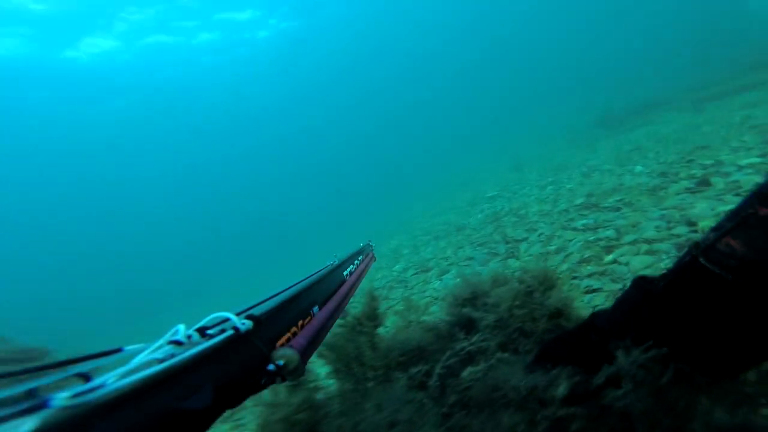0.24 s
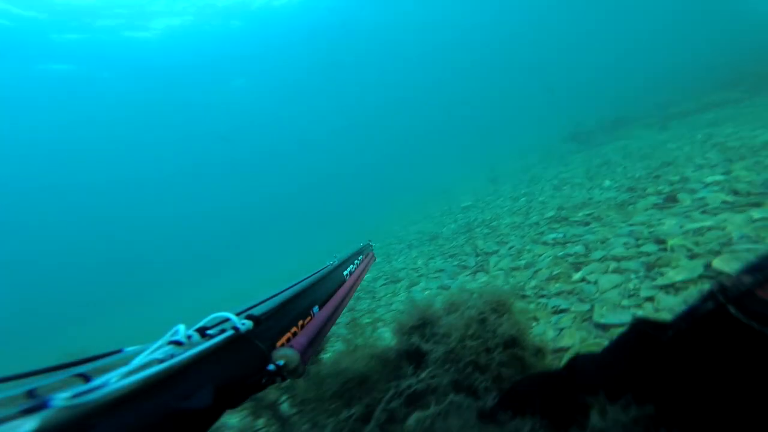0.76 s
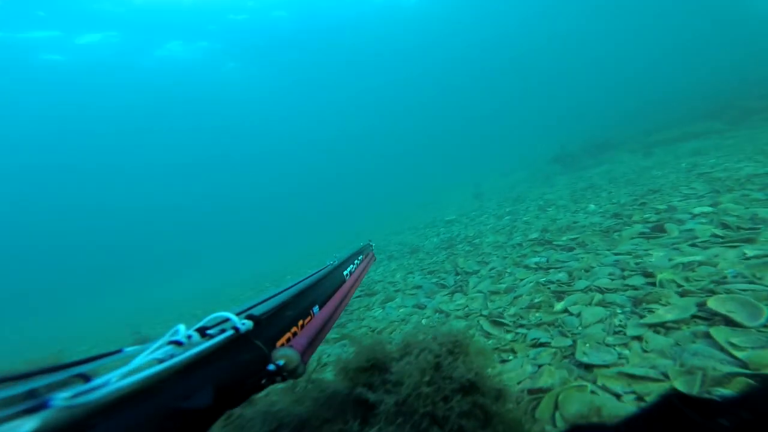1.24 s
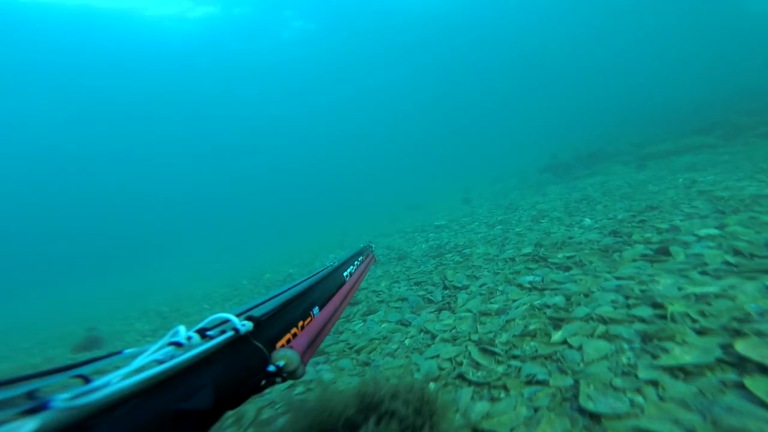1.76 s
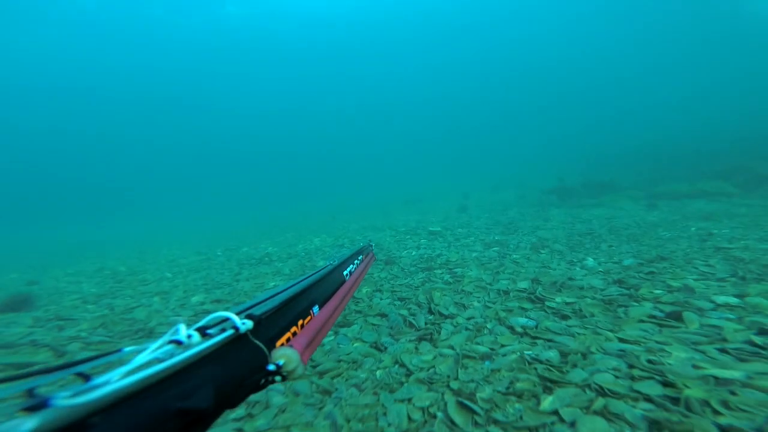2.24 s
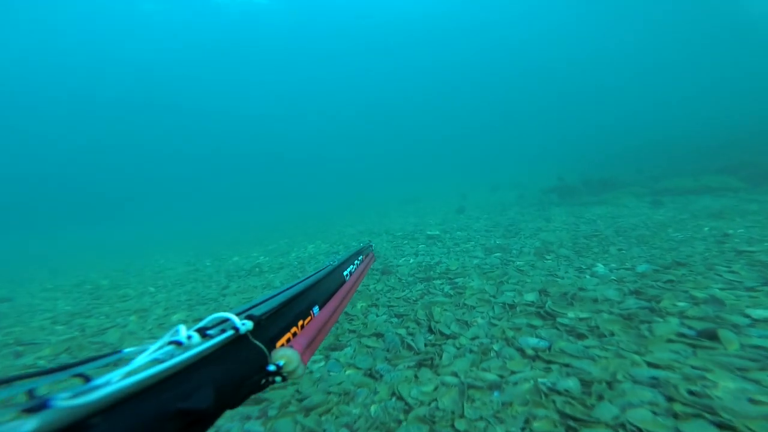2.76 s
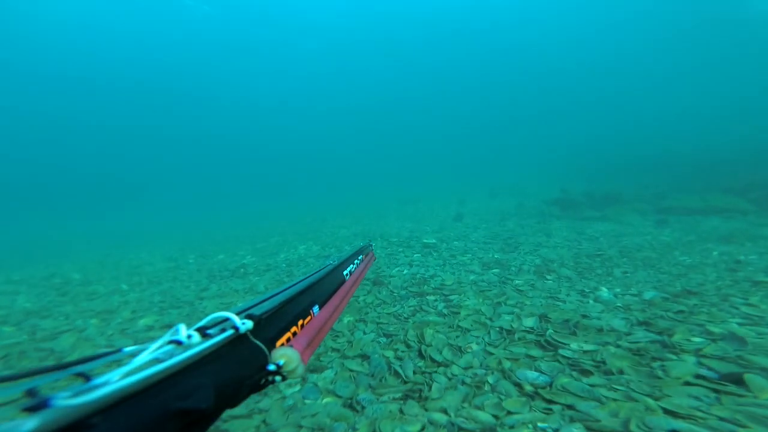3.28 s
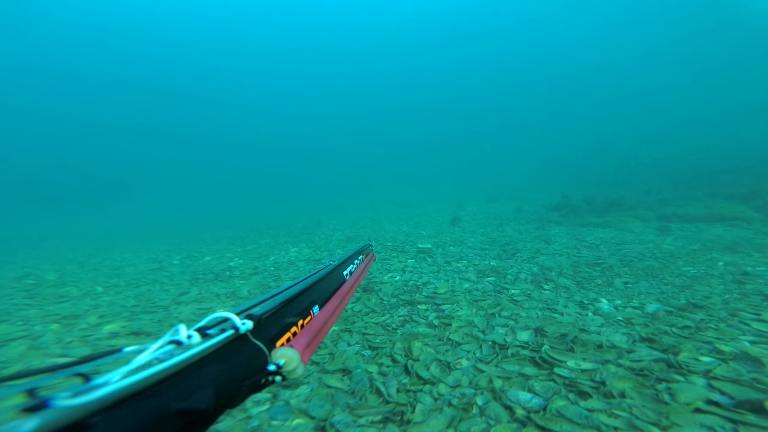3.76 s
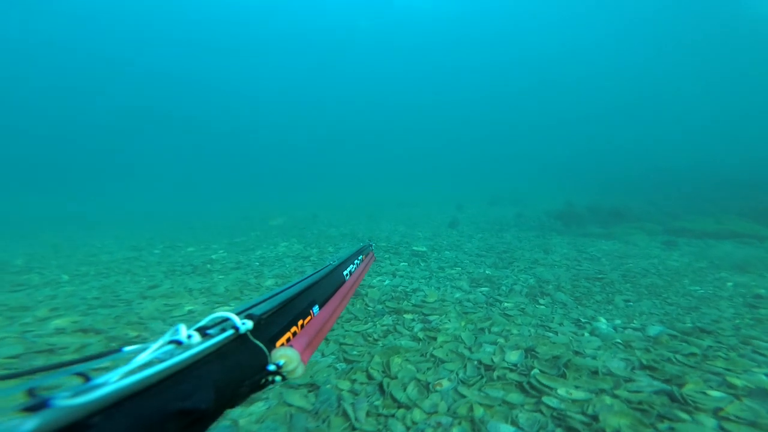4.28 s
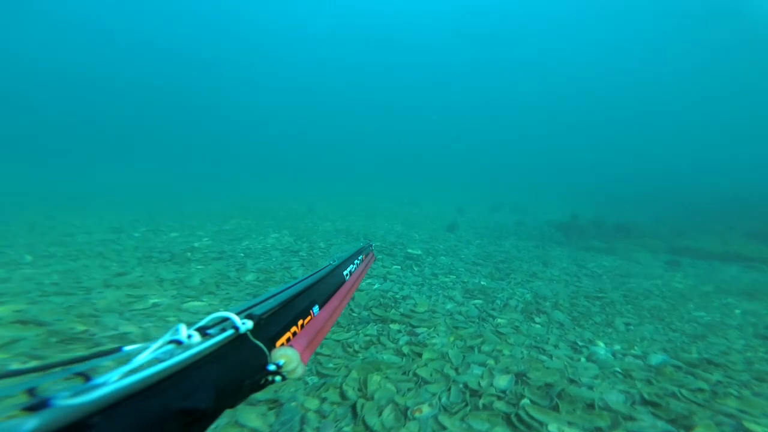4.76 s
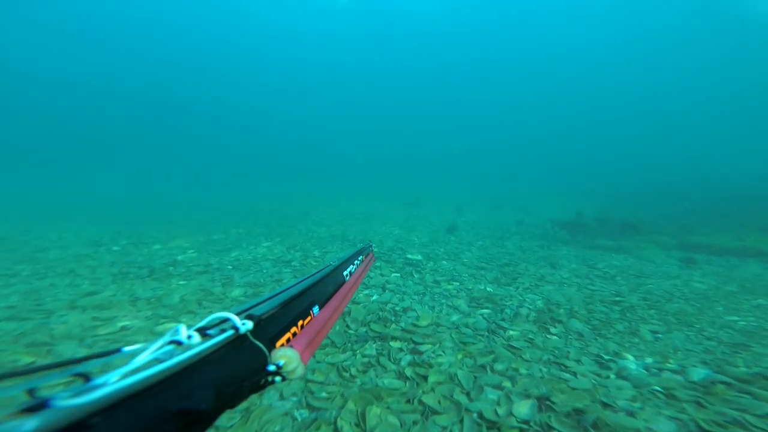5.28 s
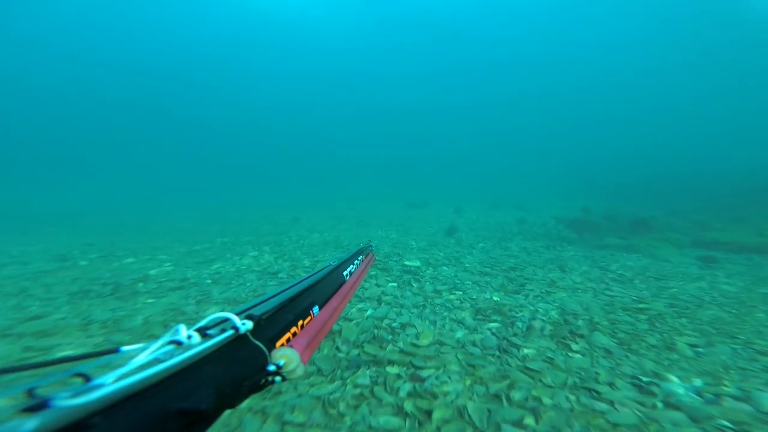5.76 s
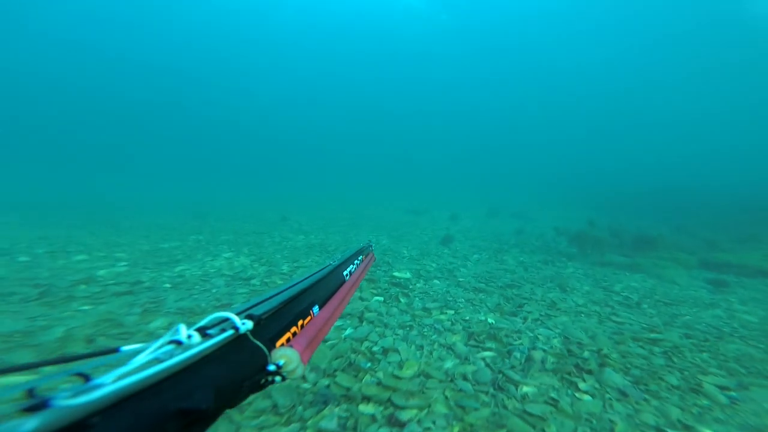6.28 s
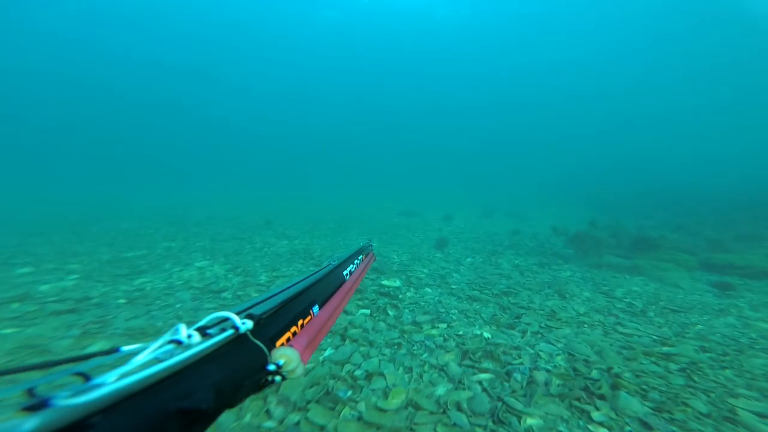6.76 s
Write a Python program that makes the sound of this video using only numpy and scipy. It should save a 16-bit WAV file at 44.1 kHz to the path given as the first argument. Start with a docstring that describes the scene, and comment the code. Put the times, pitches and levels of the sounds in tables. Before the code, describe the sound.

Underwater over a shell-covered seabed, snapping shrimp make constant irregular crackling: fine distant ticks beneath sharper, ringing near clicks, densest from about three seconds. Small bubbles plink and gurgle hollowly, and the camera housing gives occasional dull thumps, the strongest just before two seconds and again after five. Soft water wash, low flow rumble and steady electronic hiss lie underneath. Close stereo microphones inside a waterproof housing; clicks scatter left and right while low sounds stay central.

```python
"""Shrimp snaps near and far ring the modes of a camera's waterproof housing gliding over a shell-covered seabed.
Each snap is a click with sparse echoes; two microphones hear every mode at their own level and phase.
Bubbles plink and gurgle as short swelling tones, coloured by air pockets; the housing thumps and rumbles
in the flow as lower tones. Shaped noise makes the water wash and the hiss; a sign-flipped tone whines faintly."""
import sys
import numpy as np
from scipy import signal
from scipy.fft import rfft, irfft
from scipy.io import wavfile

SR = 44100
rng = np.random.default_rng(int(sys.argv[2]) if len(sys.argv) > 2 else 0)


def transcribe(u):
    """Save the signal u as a 16-bit wav file named by the first command-line argument.

    u: samples, shape (n,) or (channels, n), limited to [-1, 1]; the rate is SR.
    q: integer samples, one column per channel.
    """
    v = np.clip(np.atleast_2d(u).T, -1, 1)
    q = np.round(v * 32767).astype(np.int16)
    wavfile.write(sys.argv[1], SR, q)


N = 310023


def undb(db):
    """Decibels to amplitude gain."""
    return 10 ** (np.asarray(db) / 20)


def level(x, rms_db):
    """Scale to an rms level, taken over all channels."""
    return x * undb(rms_db) / np.sqrt(np.mean(x ** 2))


def add(out, start_s, sound):
    """Mix a short sound into out, cut at the end of out."""
    i = max(int(start_s * SR), 0)
    n = max(min(sound.shape[-1], N - i), 0)
    out[..., i:i + n] += sound[..., :n]


def filtered(x, order, cutoff_hz, kind):
    """Butterworth filter."""
    return signal.sosfilt(signal.butter(order, cutoff_hz, kind, fs=SR, output="sos"), x)


def random_curve(points):
    """Random values joined by straight lines over the whole sound."""
    return np.interp(np.linspace(0, 1, num=N), np.linspace(0, 1, num=points), rng.standard_normal(points))


def ring(x, pitch_hz, width_hz):
    """One resonance as a rotating, decaying complex arrow; gain 1 at the centre."""
    pole = np.exp((2j * np.pi * pitch_hz - np.pi * width_hz) / SR)
    return signal.lfilter([1 - abs(pole)], [1, -pole], x)


# housing modes: (pitch_hz, width_hz, left_gain_db, right_gain_db, left_lead_rad)
HOUSING_MODES = [(1200, 350, -15, -6, 0.5), (1730, 120, -10, 2, 2.9), (1890, 180, -7.5, -9.5, 1.7),
                 (2170, 350, -4, -14, -1.0), (2630, 190, -1.5, 3.5, -1.6), (2900, 260, -14.5, -1.5, -1.9),
                 (3400, 430, -7.5, -8.0, 2.4), (3990, 450, -11.0, -11.0, -1.7),
                 (4900, 250, -3.5, -1.0, -3.1), (5230, 460, -9.0, -4.0, 1.6), (5990, 580, -9.0, -4.5, 0.1),
                 (6720, 700, -14.5, -9.0, -0.3), (7930, 1720, -13.0, -13.5, -2.0),
                 (9980, 2010, -15.0, -14.5, 2.9), (11560, 1670, -19.5, -18.5, 0.8),
                 (15070, 1570, -18.0, -13.5, 0.6)]


def housing(force):
    """Modes ring under their forces; each microphone sits at a different place on each mode."""
    out = np.zeros((2, N))
    for k, (pitch_hz, width_hz, left_db, right_db, lead_rad) in enumerate(HOUSING_MODES):
        soft = ring(force[k], pitch_hz, 0.8 * pitch_hz)  # a mode answers little far from its own pitch
        sense = (-1) ** k  # neighbouring modes swing in opposite sense
        motion = sense * ring(soft, pitch_hz, width_hz)
        left = undb(left_db) * (motion * np.exp(1j * lead_rad)).imag
        right = undb(right_db) * motion.imag
        out += np.array([left, right])
    # the ringing keeps little below about 1 kHz
    return filtered(out, 2, 950, "high")


def strike(rows, decay_s, echo_db, scatter_db):
    """Force on each mode: a click, then sparse seabed echoes falling 60 dB per decay time; own colour per snap."""
    BROAD_DB = -35  # weak click at all pitches
    modes_hz = np.array(HOUSING_MODES)[:, 0]
    force = np.zeros((len(modes_hz), N))
    t = np.arange(SR // 25) / SR
    for (start_s, force_db, pitch_hz, octaves), t60_s in zip(rows, np.broadcast_to(decay_s, len(rows))):
        sparse = rng.standard_normal(len(t)) ** 3 / 4
        burst = undb(echo_db - 60 * t / max(t60_s, .004)) * sparse
        burst[0] = 1  # the click
        burst /= np.linalg.norm(burst)
        colour = undb(-6 * (np.log2(modes_hz / pitch_hz) / octaves) ** 2)
        mode_db = force_db + scatter_db * rng.standard_normal(len(modes_hz))
        gain = (colour + undb(BROAD_DB)) * undb(mode_db)
        add(force, start_s, np.outer(gain, burst))
    return force


# near shrimp snaps: (start_s, force_db, strongest_pitch_hz, breadth_octaves to 6 dB down);
# force_db is before the random scatter over modes
NEAR_SNAPS = [(0.055, -4, 6200, 0.5), (0.072, -5.5, 2300, 2.5), (0.3507, 2, 5800, 0.5),
              (0.526, -4.5, 5800, 0.6), (0.61, -4.5, 2720, 1.5), (0.6822, -3.5, 3500, 0.5),
              (0.694, -3, 5800, 1.1), (0.9624, -6, 5900, 1), (1.3063, 5, 3700, 0.6),
              (1.3865, 1.5, 10000, 1), (1.5533, -1, 2640, 0.8), (1.601, -7.5, 6000, .5),
              (1.6772, 9, 2640, 0.5), (1.7234, 0, 7000, 3), (1.8254, -0.5, 3700, 1),
              (1.8768, -5.5, 5900, 2.5), (1.9725, 2.5, 5500, 2), (2.487, -5, 3000, 3), (2.4937, 4, 7000, 2),
              (2.6686, 1.5, 1900, 1.1), (2.6949, -2, 5000, 2), (2.744, -5.5, 3000, 2.5),
              (2.7777, -5.5, 2500, 1.5), (2.797, -5, 6300, 1), (2.9178, 5.5, 14000, 2.5),
              (2.938, 0, 2400, 1), (3.0107, 0.5, 3600, 1), (3.023, -4, 2800, 4), (3.064, 10, 1700, 0.56),
              (3.0647, 1.5, 5530, 1.5), (3.1627, 6.5, 4600, 0.9), (3.2022, 8, 9000, 2),
              (3.3207, -2, 2200, 1), (3.4851, -1, 6200, 1.1), (3.512, -4, 2400, 1.1),
              (3.737, -5, 3200, 0.5), (3.7818, -1, 7800, 1), (3.7942, 5.5, 2700, 1.5),
              (3.9785, -2, 6500, 1), (4.056, 2.5, 6000, 2), (4.0615, 0.5, 6000, 2), (4.1274, 4, 6200, 0.5),
              (4.2048, -3, 8000, 7), (4.225, -4, 2700, -0.5), (4.2637, -1, 2300, 0.2),
              (4.3028, -8, 2700, 0.5), (4.396, -4.5, 5900, 0.5), (4.4985, -8, 2800, 0.5),
              (4.5867, -2.5, 3200, 0.8), (4.671, 7, 5800, .5), (4.7852, 6, 1150, 0.3), (4.891, 1, 6500, 1),
              (4.9867, 0.5, 12000, 2), (5.0422, 1.5, 2800, 2), (5.098, -2.5, 6000, 8.5),
              (5.2066, 8, 2700, 1), (5.2103, 4.5, 5000, 9), (5.375, -0.5, 1800, 0.5),
              (5.3844, -5.5, 5800, 6), (5.4372, -7, 6200, 1.5), (5.5145, -2, 5500, 1),
              (5.5241, -2.5, 11000, 2.5), (5.5493, 1.5, 2200, 1), (5.558, 0, 2600, 2.5),
              (5.5748, -0.5, 2900, 1), (5.6303, -6, 5500, 6), (5.6838, -1.5, 10000, 1.5),
              (5.8503, -6.5, 9000, 0.5), (5.9288, -1.5, 2700, 1.8), (5.937, -5.5, 6000, 0.6),
              (6.0898, -5, 5930, 2.2), (6.1248, 0, 6160, 0.8), (6.179, -4, 2200, 1), (6.2055, -5, 2600, 5),
              (6.2885, 3.5, 1460, 2), (6.2929, 8, 2600, 3), (6.5037, -3, 8000, 1.5),
              (6.5237, -1, 6500, 1.5), (6.7488, -7, 5800, 1), (6.811, -8, 4000, 3.5),
              (7.0046, -7, 2570, 0.5)]


def near_snaps():
    """Snaps strike the housing one by one, exciting its modes unevenly."""
    return housing(strike(NEAR_SNAPS, decay_s=0.05, echo_db=-25.5, scatter_db=2))


def crackle():
    """Shrimp at middle distance: random snaps, many small and a few large, in flurries."""
    count, flurry_points = int(200 * N / SR), int(14 * N / SR)
    when, size, decay, breadth = rng.random((count, 4)).T
    pitch_hz = 5000 * np.exp(0.51 * rng.standard_normal(count))
    size_db = -5.5 * np.log(1 - 0.9 * size)
    flurry = np.interp(when, np.linspace(0, 1, num=flurry_points), rng.standard_normal(flurry_points))
    rows = np.column_stack([when * N / SR, size_db + 2.2 * flurry, pitch_hz, 0.29 + 3 * breadth ** 2])
    return housing(strike(rows, 0.047 * (0.55 + decay), echo_db=-24, scatter_db=3.5))


def sizzle():
    """Far shrimp merge into smooth noise on every mode, swelling at random."""
    swell_db = 3.0 * random_curve(60)
    return housing(undb(swell_db) * rng.standard_normal((len(HOUSING_MODES), N)))


def shrimp(t):
    """Near snaps over crackle and sizzle, which grow as the open seabed nears."""
    FAR_DB, FAR_DB_PER_S = -63, 0.31
    far = level(crackle(), 2.24) + level(sizzle(), -8.0)
    return near_snaps() + undb(FAR_DB + FAR_DB_PER_S * t) * far


def stereo_noise(pitch_hz, db_per_hz, alike):
    """Noise with a spectrum for each channel; alike is the correlation of left and right before shaping."""
    mid, side = rng.standard_normal((2, N))
    alike = np.clip(alike, 0, 1)
    pair = np.sqrt(1 + alike) * mid + np.sqrt(1 - alike) * side * np.array([[1], [-1]])
    pair *= np.sqrt(SR) / 2  # 0 dB per Hz
    bins = np.log(np.fft.rfftfreq(N, 1 / SR) + 1)
    gain = undb([np.interp(bins, np.log(pitch_hz), db) for db in db_per_hz])
    return irfft(rfft(pair) * gain, N)


# water pressure at the microphones: (pitch_hz, level_db_per_hz)
WASH_SPECTRUM = [(20, -99), (40, -94.5), (80, -98), (130, -92), (210, -87), (320, -94), (480, -94),
                 (640, -87), (800, -96), (1100, -101), (1800, -130)]


def wash():
    """Water pressure noise, mostly shared by the microphones."""
    pitch_hz, db_per_hz = np.transpose(WASH_SPECTRUM)
    return stereo_noise(pitch_hz, [db_per_hz, db_per_hz], alike=0.88)


def blips(rows, lead, glide):
    """Short tones that swell for one rise time, die away and glide up; they start lead rise times early."""
    out = np.zeros(N)
    for time_s, peak_db, pitch_hz, rise_s in rows:
        t = np.arange(int(8 * rise_s * SR)) / SR
        shape = (t / rise_s) ** 2 * np.exp(2 - 2 * t / rise_s)
        tone = np.sin(2 * np.pi * pitch_hz * t * (1 + glide * (t / rise_s - 2)))
        add(out, time_s - lead * rise_s, undb(peak_db) * shape * tone)
    return out


def swarm(per_s, pitches_hz, spread, rise_s, scatter_db):
    """A random stream of blips around some pitches, many small and a few large; rms 1."""
    count = int(per_s * N / SR)
    when, size, choice = rng.random((count, 3)).T
    detune, stretch = rng.standard_normal((count, 2)).T
    pitch_hz = np.array(pitches_hz)[(choice * len(pitches_hz)).astype(int)] * np.exp(spread * detune)
    size_db = -scatter_db * np.log(1 - .9 * size)
    rows = zip(when * N / SR, size_db, pitch_hz, rise_s * np.exp(0.44 * stretch))
    return level(blips(rows, lead=0, glide=0.041), 0)


# rumble of flow round the housing, before the low cut: (time_s, drive_db)
RUMBLE_DRIVE = [(0, -62.5), (.6, -58), (1.3, -58), (2.8, -58.5), (3.3, -62), (4.1, -57.5), (5.0, -67),
                (5.7, -55), (6.64, -80), (6.69, -49), (7.03, -49)]


def rumble(t):
    """Flow round the housing: a dense swarm of low tones."""
    drive_db = np.interp(t, *np.transpose(RUMBLE_DRIVE))
    return undb(drive_db) * swarm(180, [165, 205, 240], spread=0.1304, rise_s=0.01, scatter_db=8.0)


# gurgle of small bubbles, before the filters and air pockets: (time_s, drive_db)
GURGLE_DRIVE = [(0, -60.5), (3.0, -53), (7.03, -50)]


def gurgle(t):
    """Small bubbles: a swarm of brief tones with the treble softened."""
    drive_db = np.interp(t, *np.transpose(GURGLE_DRIVE))
    stream = swarm(520, [400, 540, 660], spread=0.12, rise_s=0.0016, scatter_db=3.5)
    return filtered(undb(drive_db) * stream, 1, 1600, "low")


# loud bubbles, before the air pockets and low cut: (time_s, drive_peak_db, pitch_hz, rise_cycles)
BUBBLE_PLINKS = [(0.264, -32, 600, 0.63), (0.421, -39, 644, 1.53), (0.896, -42.5, 620, 1.04),
                 (1.535, -46, 1100, 5), (1.79, -40, 583, 1.36), (1.799, -25.5, 350, 0.71),
                 (1.877, -41.5, 670, 1.44), (2.174, -33, 606, 1.02), (2.512, -38, 420, 0.3),
                 (2.613, -41, 560, 0.88), (2.804, -41, 620, 1.07), (2.954, -39, 611, 0.72),
                 (2.966, -34.5, 670, 0.53), (2.988, -37, 625, 0.77), (3.099, -36.5, 630, 1.33),
                 (3.273, -31, 555, 1.37), (3.348, -36.5, 504, 0.91), (3.66, -38.5, 655, 0.87),
                 (3.707, -42, 550, 0.94), (4.025, -39.5, 693, 1.4), (4.093, -42.5, 546, 1.3),
                 (4.193, -40.5, 540, 2.9), (4.356, -34, 500, 1.2), (4.383, -41.5, 654, 1.5),
                 (4.783, -31, 450, 0.52), (4.831, -35.5, 613, 0.62), (4.911, -39.5, 600, 0.97),
                 (5.082, -33, 590, 0.75), (5.16, -36, 650, 0.98), (5.353, -37.5, 615, 1.15),
                 (5.509, -29, 616, 0.65), (5.893, -44, 633, 1.3), (5.936, -38, 644, 1.28),
                 (6.109, -41.5, 660, 1.77), (6.288, -34.5, 650, 0.61), (6.405, -30, 597, 1.33),
                 (6.57, -41, 570, 1.6), (6.623, -40, 546, 1.5), (6.643, -42, 620, 0.93),
                 (6.681, -33.5, 649, 0.86), (6.769, -40, 640, 0.52), (6.78, -38, 626, 1.54),
                 (6.889, -42, 564, 1.54), (6.964, -32.5, 374, 2.04)]


def plinks():
    """Each loud bubble is a tone that swells over a few vibrations or less."""
    rows = [(time_s, db, hz, cycles / hz) for time_s, db, hz, cycles in BUBBLE_PLINKS]
    return blips(rows, lead=0.59, glide=0.0015)


# air pockets in the housing: (pitch_hz, width_hz, gain_db)
AIR_POCKETS = [(250, 86, 10), (581, 2.2, 9), (671, 43, 12.5), (762, 71, 3)]


def air(knocks):
    """Knocks pass straight through and also ring the air pockets inside the housing."""
    ringing = sum(undb(db) * ring(knocks, hz, width_hz).imag for hz, width_hz, db in AIR_POCKETS)
    return knocks + ringing


# thumps of the housing: (time_s, peak_db, pitch_hz, rise_s)
HOUSING_THUMPS = [(0.329, -43.5, 210, 0.014), (0.467, -44.5, 218, 0.019), (0.735, -44.5, 222, 0.0077),
                  (1.037, -43.5, 187, 0.0093), (1.481, -38.5, 265, 0.0086), (1.527, -40.5, 164, 0.015),
                  (1.528, -38.5, 386, 0.011), (1.566, -44.5, 165, 0.0087), (1.803, -16.5, 231, 0.0049),
                  (2.087, -31.5, 216, 0.0079), (2.662, -40.5, 167, 0.0057), (4.018, -39, 221, 0.0093),
                  (4.047, -35, 209, 0.0062), (4.54, -36, 197, 0.0078), (5.356, -22.5, 233, 0.0078),
                  (5.701, -35.5, 213, 0.011), (5.791, -32.5, 195, 0.017), (6.694, -39, 194, 0.011),
                  (6.751, -41, 218, 0.0076), (6.785, -44, 369, 0.018), (6.79, -45, 187, 0.0081),
                  (6.822, -42.5, 345, 0.014), (6.847, -42, 254, 0.0065), (6.9, -41, 193, 0.0068),
                  (6.929, -39, 215, 0.0082), (6.978, -43, 222, 0.013)]


def thumps():
    """The housing thumps in the flow: low tones that swell and die."""
    return blips(HOUSING_THUMPS, lead=0.26, glide=0.0028)


def water(t):
    """Low sounds squeeze the whole housing, so both microphones hear them alike; only the wash differs."""
    knocks = rumble(t) + air(gurgle(t) + plinks())
    return thumps() + filtered(knocks, 3, 115, "high") + wash()


# microphone hiss spectrum: (pitch_hz, left_relative_db, right_relative_db)
HISS_SPECTRUM = [(50, -9, -9), (230, 12, 12), (380, 9, 9), (800, 3, 3), (1200, 0, 2), (3000, -1, 0),
                 (6000, -1, 1), (9000, -2, -1), (11000, -4, -2.5), (11900, 3, 3), (12400, 0, 2),
                 (13100, 2, 4), (13600, -1, -1), (14000, 4, 1), (14700, -1, 1), (16000, -2, -1)]


def hiss():
    """Steady shaped noise, partly shared by the channels."""
    pitch_hz, *relative_db = np.transpose(HISS_SPECTRUM)
    return level(stereo_noise(pitch_hz, relative_db, alike=0.2), -56.0)


def whine(t):
    """A tone changing sign 50 times a second, which splits it into lines 50 Hz apart; far stronger right."""
    WHINE_HZ, FLIP_HZ, FLIP_SHARPNESS = 13125, 25, 2.6
    flip = np.tanh(FLIP_SHARPNESS * np.sin(2 * np.pi * FLIP_HZ * t))
    tone = flip * np.sin(2 * np.pi * WHINE_HZ * t)
    return level(tone, -63.0) * undb([[-23], [0]])


def electronics(t):
    """Hiss and whine of the electronics."""
    return hiss() + whine(t)


def scene():
    """Shrimp, water and electronics together."""
    t = np.arange(N) / SR
    return shrimp(t) + water(t) + electronics(t)


def record(dry):
    """The recorder cuts the top with a steep elliptic low-pass."""
    TOP_HZ, RIPPLE_DB, STOP_DB = 15830, .2, 70
    return signal.sosfilt(signal.ellip(10, RIPPLE_DB, STOP_DB, TOP_HZ, fs=SR, output="sos"), dry)


dry = scene()
out = record(dry)
transcribe(out)
```